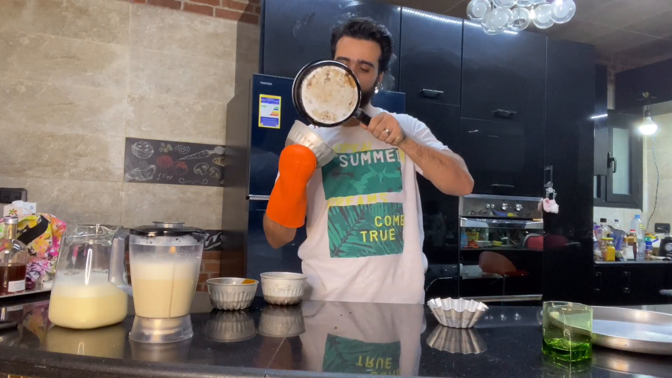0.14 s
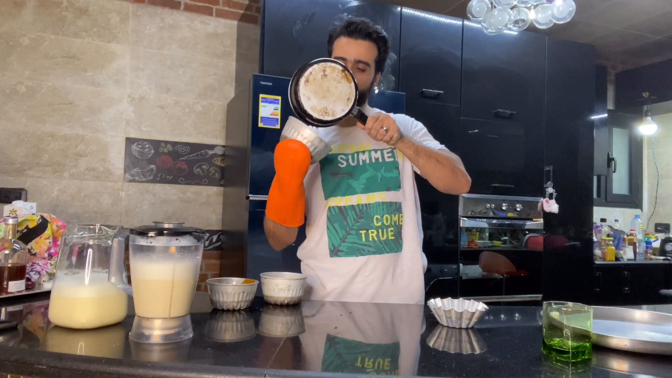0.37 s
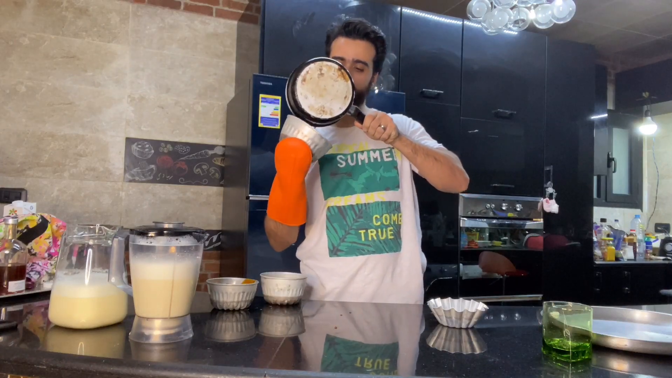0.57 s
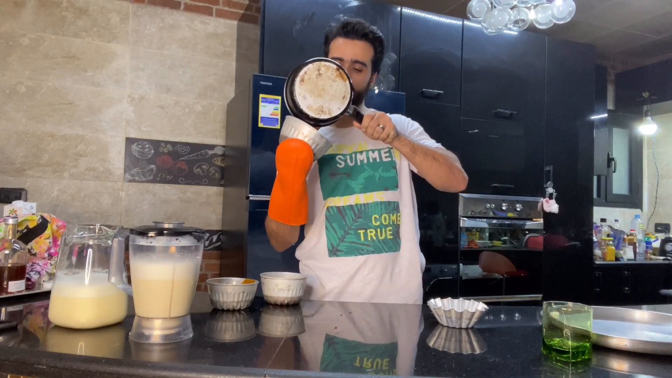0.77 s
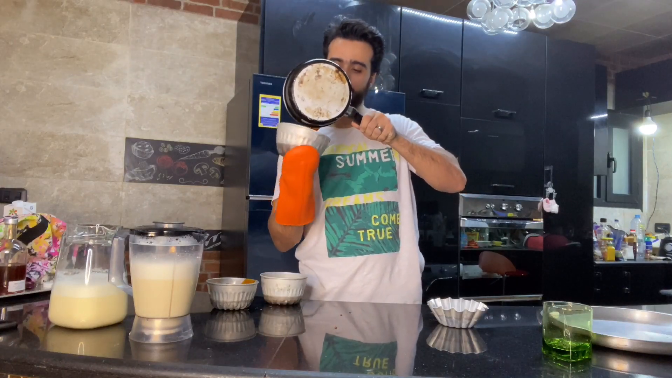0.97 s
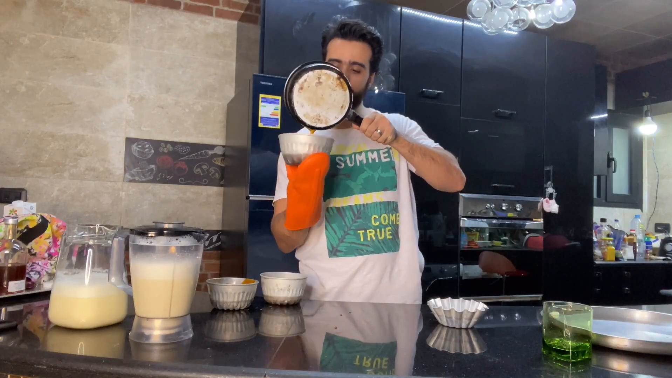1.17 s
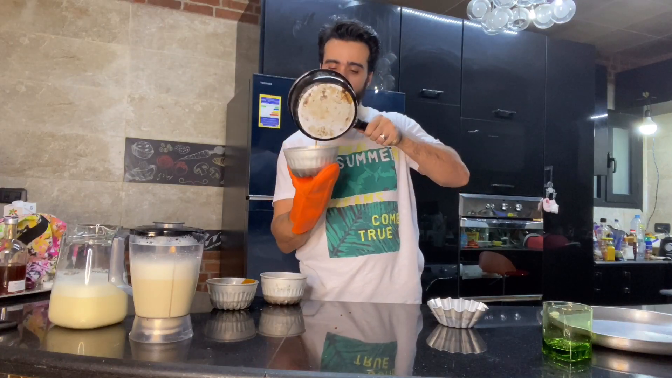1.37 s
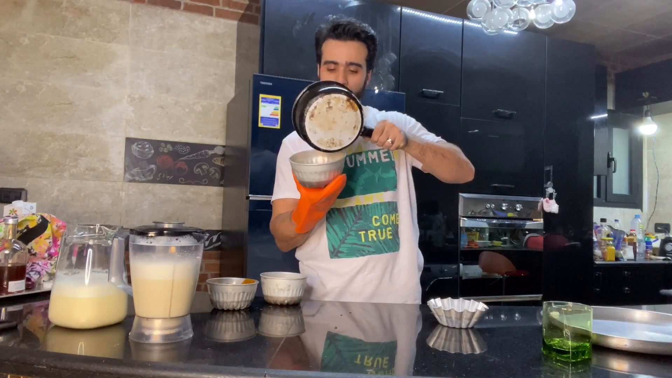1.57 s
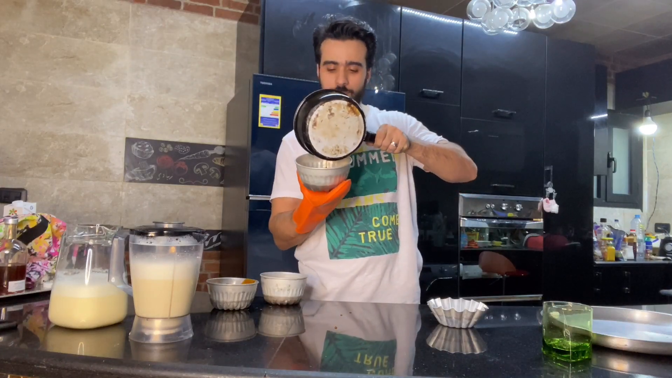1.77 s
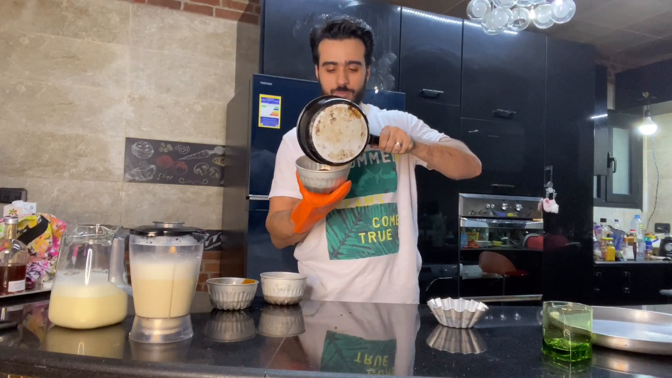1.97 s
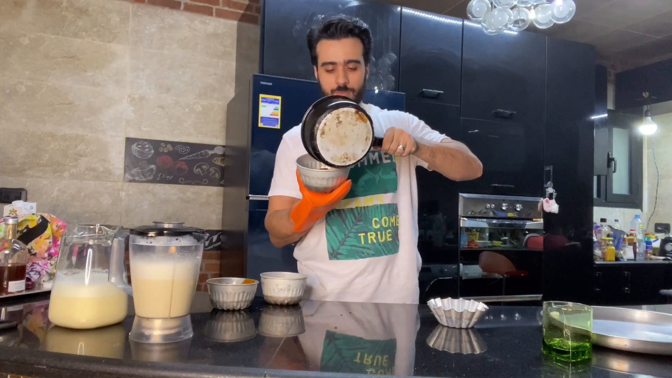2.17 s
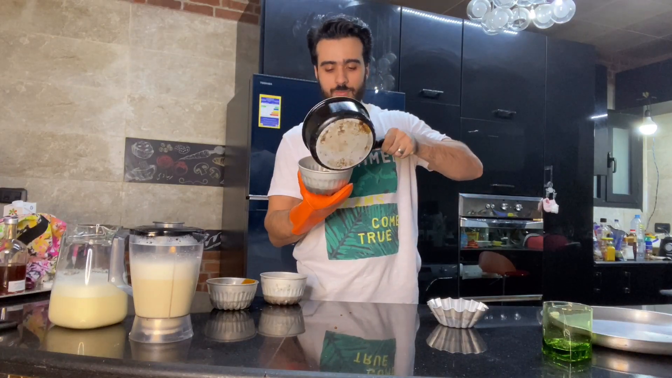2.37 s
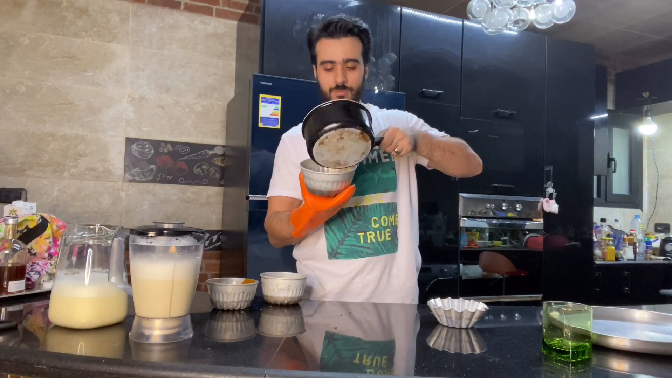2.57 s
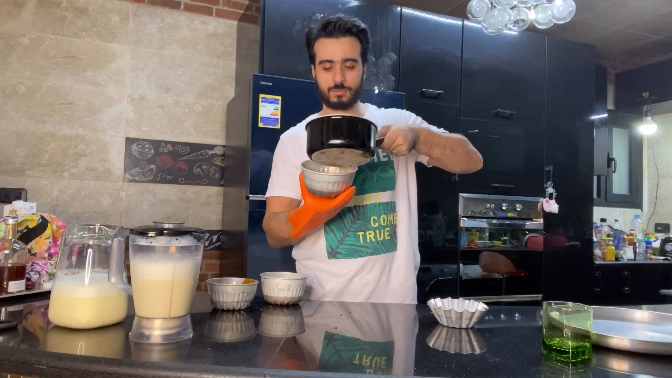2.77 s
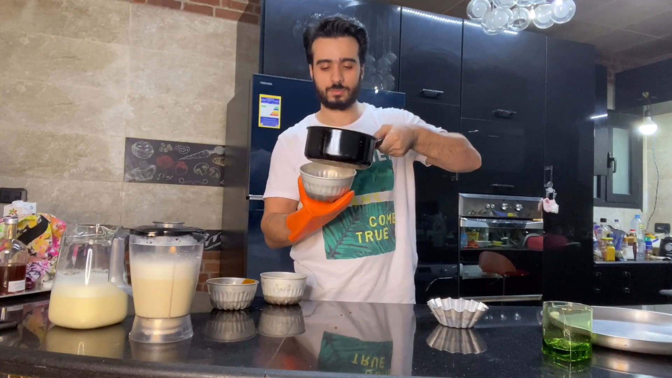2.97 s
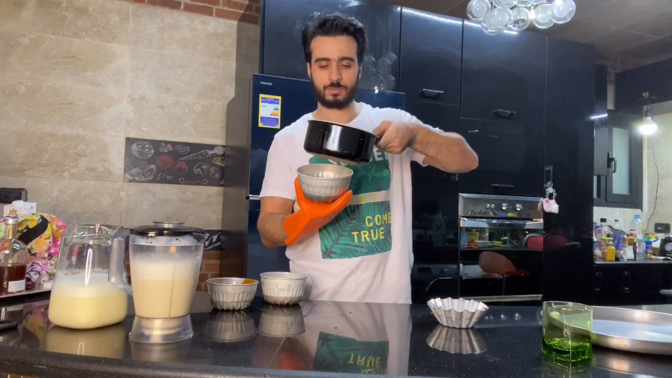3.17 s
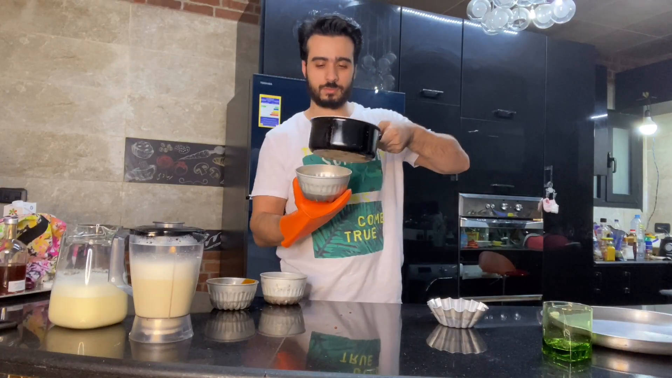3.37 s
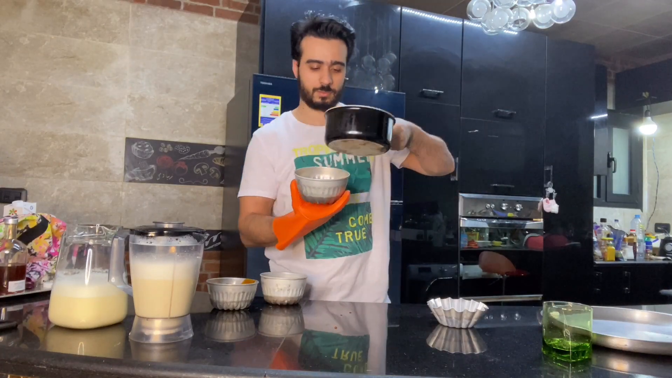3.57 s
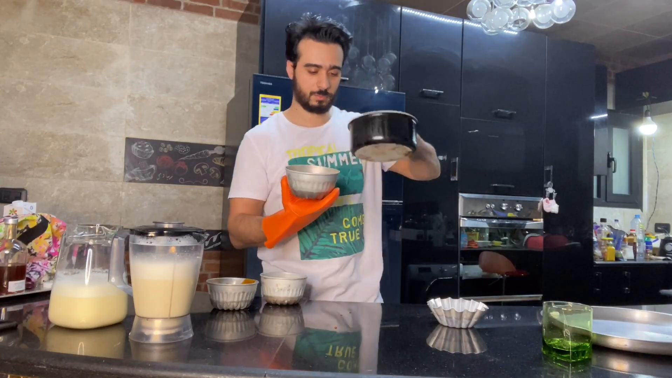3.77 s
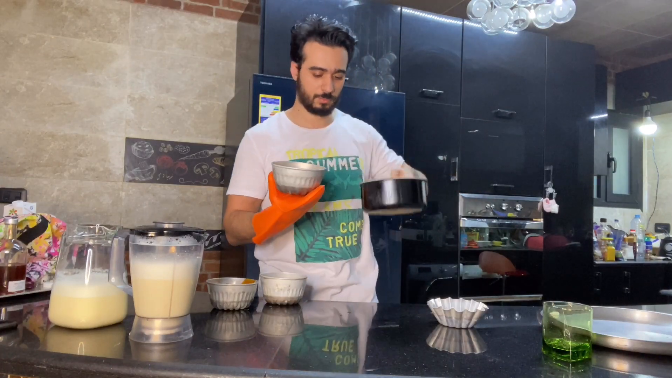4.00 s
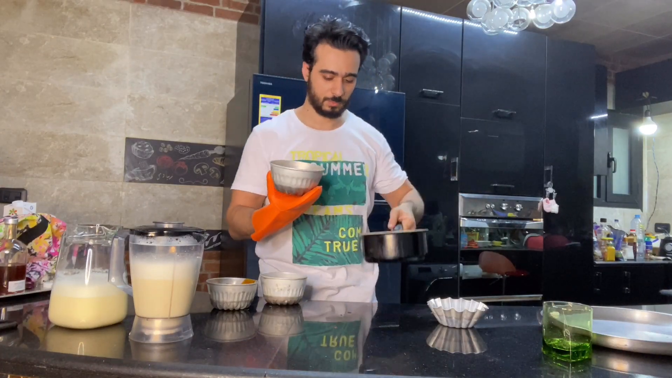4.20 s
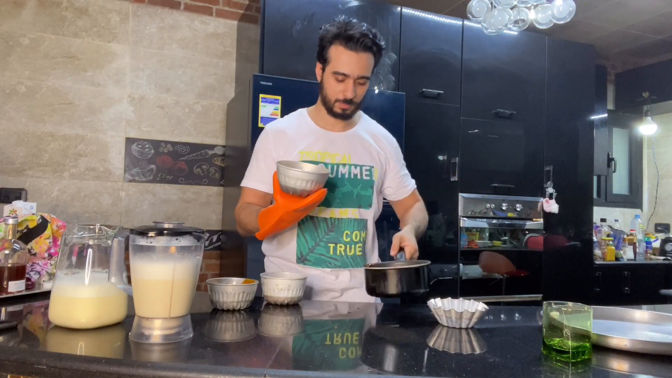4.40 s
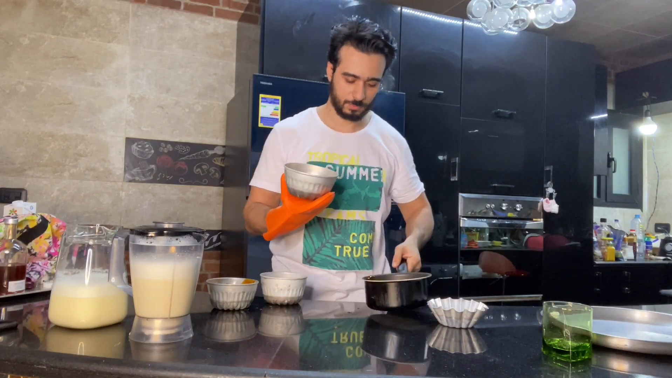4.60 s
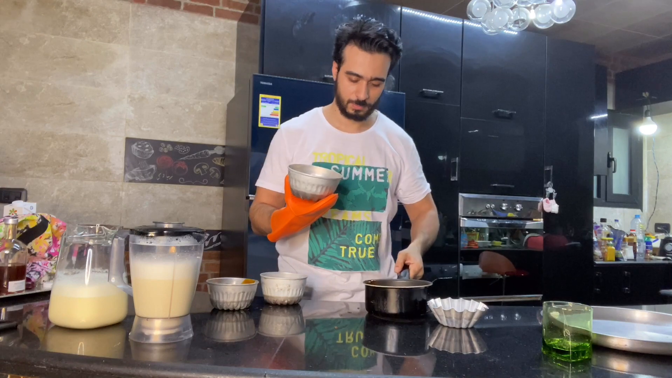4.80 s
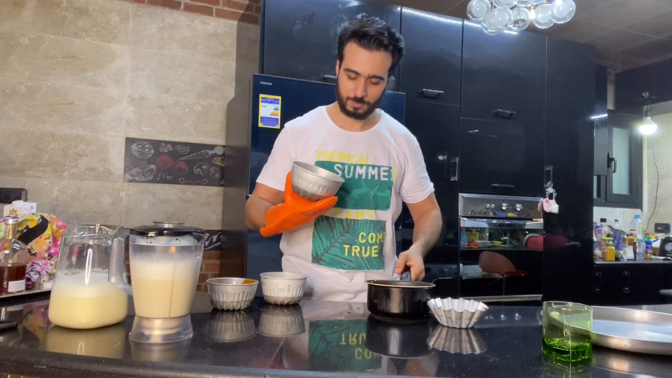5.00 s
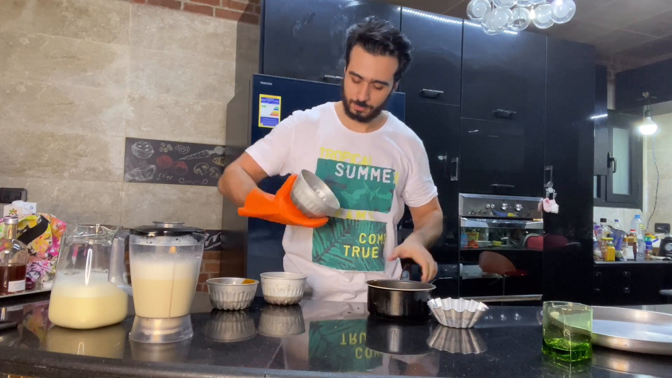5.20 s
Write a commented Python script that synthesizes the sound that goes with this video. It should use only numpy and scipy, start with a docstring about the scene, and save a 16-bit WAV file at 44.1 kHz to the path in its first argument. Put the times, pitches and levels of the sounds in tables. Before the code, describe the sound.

A kitchen with hard, reflective walls, heard in stereo from across the counter. Low rumble, faint hiss and a slightly drifting deep appliance hum run throughout. From 0 s hot caramel seethes softly as it runs from a saucepan, a low-mid fluttering murmur with fine fizz at the very start and a fainter surge around 1.5 s; after 1.6 s the stream thins and fades away. At 2.07 and 2.25 s the pan rim knocks the metal mould: two short bright clinks, the second duller, with a brief roomy reverberation. The hum's higher tone swells near 2.9, 3.3 and 4 s. Soles scuff lightly at 3.2, most clearly at 3.5, then faintly at 3.75 s. Rumble eases after 4.2 s. At 4.76 s the saucepan lands on stone with the loudest, solid knock, rocking in quick small taps until 4.9 s while its base rubs dully; a softer double tap and rub follow at 5.12 s.

```python
"""Hot caramel seethes softly from saucepan to metal mould in a kitchen: coloured noise, fluttering, thinning out.
An appliance hums (two drifting sines) over rumble and hiss (steady noise).
The pan's rim knocks the mould twice: noise bursts and decaying modes, answered by hard walls (noise echoes).
Soles shuffle on the floor: noise strokes. The pan lands, rocking, on a stone counter and its base rubs."""
import sys
import numpy as np
from scipy import signal
from scipy.fft import rfft, irfft, next_fast_len
from scipy.io import wavfile
from scipy.ndimage import uniform_filter1d, map_coordinates

SR = 44100
rng = np.random.default_rng(int(sys.argv[2]) if len(sys.argv) > 2 else 0)


def wav_record(signal):
    """Record a signal, one row per channel, as 16-bit PCM in the file named by sys.argv[1]."""
    frames = np.transpose(np.atleast_2d(signal))
    bounded = np.clip(frames, -1, 1)
    # unit amplitude maps onto the largest positive 16-bit level
    quanta = np.round(bounded * 32767).astype(np.int16)
    wavfile.write(sys.argv[1], SR, quanta)


N = 231436

# Spectra are relative: each sound is normalised, then set to its own level.
# seething syrup: freq_hz, density_db_per_hz
SEETHE_SPECTRUM = [(140, -16), (195, 12.5), (260, 1), (350, 5), (480, 4.5), (700, -1), (1100, -3),
                   (1450, -6), (1900, -6.5), (2300, -19.5), (2900, -31.5), (6000, -44)]
# finest bubbles: freq_hz, density_db_per_hz
FIZZ_SPECTRUM = [(1200, -32.5), (1700, -6), (2200, 1), (2450, -3.5), (2900, -25.5), (6000, -45.5)]
# surges of fine bubbling: full_s, hold_s, level_db
FIZZ_SURGES = [(0.026, 0.264, -73), (1.44, .2, -74.5)]
# room rumble: freq_hz, density_db_per_hz
RUMBLE_SPECTRUM = [(20, -20.5), (32, -15.5), (45, -5.5), (65, -8), (105, -6.5), (140, -12), (230, -17.5),
                   (430, -18.5), (700, -28.5), (1150, -31), (1500, -39.5), (2400, -41), (3200, -50),
                   (6000, -62.5)]
# faint hiss: freq_hz, density_db_per_hz
HISS_SPECTRUM = [(500, -34.5), (2500, 0), (4800, -1.5), (5200, 1.5), (5700, -3), (8500, -2), (12000, -6.5),
                 (13800, -14), (15000, -29.5)]
# swells of the motor hum's octave: full_s, hold_s, level_db
OCTAVE_SWELLS = [(2.865, 0.074, -53.5), (3.246, 0.3, -54), (3.923, 0.18, -53.5)]
# pan rim on mould: time_s, knock_db, contact_edge_hz, pan_db, clack_db, snap_db, thud_db, mould_db
CLINK_HITS = [(2.0689, -2, 2900, -13.5, -3, -28, -15.5, 3.5), (2.2536, -2, 2180, -1, -13, -26, -17, -2.5)]
# pan on counter: time_s, knock_db, contact_edge_hz, pan_db, clack_db, snap_db, thud_db
LANDING_HITS = [(4.7619, 4, 1740, -0.5, -13, -41, -12), (4.773, -16.5, 1010, -0.5, -16, -47, -12.5),
                (4.787, -2.5, 1310, -20, -20, -52, -19), (4.803, -2.5, 1180, -5, -20, -54, -16),
                (4.838, -9, 1610, -29, -37, -66, -25), (4.899, -18.5, 2120, -29, -19.5, -34.5, -31),
                (5.118, -17, 1670, -15, -23.5, -22, -16), (5.121, -9.5, 930, -10, -41, -43, -18)]
# saucepan modes: freq_hz, relative_energy_db, t60_s
PAN_MODES = [(286, -14, .12), (451, -3, .12), (655, -16, .08), (752, -14, .15), (786, -10, .18),
             (850, -11, .08), (913, -3, .18), (950, -6, .14), (1000, -8, .2), (1140, -7, .16),
             (1185, -10, .2), (1372, -7, .12), (1428, -7, .16), (1497, -3, .2), (1576, -6, .2),
             (1700, -6, .06), (1798, 3, .22), (2610, -12, .34)]
# mould modes: freq_hz, relative_energy_db, t60_s
MOULD_MODES = [(448, -8, .07), (525, -10, .08), (668, -1, .07), (1015, -8, .08), (1190, -8, .06),
               (1335, -11, .1), (1470, -11, .08), (1805, -1, .16), (1890, 0, .1), (2000, -1, .05),
               (2134, -3, .1), (2645, -6, .14), (2713, -6, .08), (2923, -10, .05), (3250, -15, .04),
               (3526, -13, .5), (4035, -13, .05), (5050, -16, .05), (5470, -16, .04), (5990, -22, .06)]
# edge on edge: freq_hz, response_db
CLACK_RESPONSE = [(400, -6.5), (1500, 5), (2900, 4.5), (3400, 6), (3900, 1.5), (4400, -2.5), (5400, -5),
                  (7500, -16.5), (11000, -26.5), (15000, -52)]
# hard point catching: freq_hz, response_db
SNAP_RESPONSE = [(2000, -7), (5000, -4), (7500, -1), (9500, -10.5), (11500, 4), (13000, -12), (16000, -18)]
# wall reverberation: freq_hz, t60_s
WALL_DECAY = [(100, 0.71), (400, 0.41), (1000, 0.47), (2800, 0.41), (7000, 0.29), (14000, 0.3)]
# wall colour: freq_hz, response_db
WALL_RESPONSE = [(100, -8), (400, 0.5), (1000, -0.5), (3000, -3.5), (7000, 2), (14000, -4)]
# diffuse sound at two spaced ports: freq_hz, left_right_likeness (limited to -1..1)
PORT_LIKENESS = [(60, .8), (130, 0.64), (290, 0.56), (640, 0.12), (1400, -0.33), (3100, 0.076), (7000, 0.2),
                 (9200, -1.23), (10800, 0.15), (15000, .3)]
# strokes of a sole: full_speed_s, hold_s, rise_db_per_s, fall_db_per_s, scuff_db, swish_db
SOLE_STROKES = [(3.221, 0.051, 160, 81, -64.5, -61), (3.524, 0.016, 260, 161, -52.5, -56.5),
                (3.747, 0.02, 105, 129.5, -66.5, -73.5), (3.863, 0.05, 65, 63, -90, -88),
                (4.223, 0.018, 448.5, 190, -69.5, -87)]
# grainy scuff: freq_hz, density_db_per_hz
SCUFF_SPECTRUM = [(600, -7), (1400, -2.5), (1900, 3), (2300, 2.5), (2800, 4.5), (4200, -1), (5500, -5),
                  (8000, -6.5), (11000, -34)]
# fine swish: freq_hz, density_db_per_hz
SWISH_SPECTRUM = [(3000, -5), (6000, 7), (9000, 9), (12000, 6.5), (14500, -1), (16000, -19)]
# base rubbing on the counter: freq_hz, density_db_per_hz
RUB_SPECTRUM = [(25, -10), (45, -0.5), (85, 6), (130, -10), (170, -1), (230, -15), (350, -1.5), (450, -4.5),
                (600, -16), (1500, -18.5), (2500, -28), (5200, -37), (7000, -43), (14000, -60.5)]
# rubs after a landing: full_s
RUB_TIMES = [4.785, 5.125]

POUR_START_DB, COOLING_DB_PER_S = -55.5, 0.25  # the running syrup slowly calms
THINNING_START_S, THINNING_DB_PER_S = 1.6, 10  # then the stream thins out
SURGE_SLOPE_DB_PER_S = 33  # rise and fall
OCTAVE_RISE_DB_PER_S, OCTAVE_FALL_DB_PER_S = 171.5, 105
RUMBLE_DB, LULL_START_S, LULL_FADE_S, LULL_CHANGE_DB = -53.5, 4.2, 0.22, -4
RUB_DB, RUB_HOLD_S, RUB_RISE_DB_PER_S, RUB_FALL_DB_PER_S = -46, 0.19, 1500, 28
BAND_LIMIT_HZ = 15800


def amp(db):
    """Decibels to gain."""
    return 10 ** (np.asarray(db) / 20)


def unit(x):
    """Scale to rms 1."""
    return x / np.sqrt(np.mean(x ** 2) + 1e-20)


def unit_energy(x):
    """Scale each channel to energy 1."""
    return x / np.sqrt(np.sum(x ** 2, axis=-1, keepdims=True) + 1e-20)


def along(points, hz):
    """Interpolate (freq_hz, value) points on a log-frequency axis."""
    freq_hz, value = np.transpose(points)
    return np.interp(np.log(hz + 1), np.log(freq_hz + 1), value)


def wobble(knots_per_s):
    """Smooth random curve through normal random knots."""
    knots = rng.standard_normal(int(N * knots_per_s / SR) + 4)
    return map_coordinates(knots, [np.arange(N) * knots_per_s / SR])


def swell(full_s, hold_s, rise_db_per_s, fall_db_per_s):
    """Gain that rises to 1 at full_s, holds, and falls away."""
    t = np.arange(N) / SR - full_s
    rise_db = -abs(rise_db_per_s) * np.maximum(-t, 0)
    fall_db = -abs(fall_db_per_s) * np.maximum(t - hold_s, 0)
    return amp(rise_db + fall_db)


def filtered(x, response):
    """Apply a frequency response to x."""
    size = x.shape[-1]
    padded = next_fast_len(size + SR // 4)
    hz = np.fft.rfftfreq(padded, 1 / SR)
    return irfft(rfft(x, padded) * response(hz), padded)[..., :size]


def coloured(x, spectrum):
    """Causal minimum-phase colouring: an attack stays sharp."""
    size = len(x)
    gain = amp(along(spectrum, np.fft.rfftfreq(size, 1 / SR)))
    cepstrum = irfft(np.log(gain), size)
    # fold the cepstrum onto positive time
    cepstrum[1:size // 2] *= 2
    cepstrum[size // 2 + 1:] = 0
    return irfft(rfft(x) * np.exp(rfft(cepstrum)), size)


def edge(x, hz, kind, order):
    """Causal Butterworth low-pass or high-pass."""
    sos = signal.butter(order, min(hz, SR / 2 - 1), kind, fs=SR, output="sos")
    return signal.sosfilt(sos, x)


def diffuse(spectrum, size):
    """Coloured stereo noise of rms 1, as if from all sides: mid/side balance sets channel likeness."""
    def mid_side_response(hz):
        angle = np.arccos(np.clip(along(PORT_LIKENESS, hz), -1, 1)) / 2
        return amp(along(spectrum, hz)) * [np.cos(angle), np.sin(angle)]

    mid, side = filtered(rng.standard_normal((2, size)), mid_side_response)
    return unit(np.array([mid + side, mid - side]))


def caramel(flutter_db=1.53):
    """Hot syrup seethes while it runs, fizzes up in surges and dies away as the stream thins."""
    t = np.arange(N) / SR
    thinning_db = THINNING_DB_PER_S * np.maximum(t - THINNING_START_S, 0)
    seethe_db = POUR_START_DB - COOLING_DB_PER_S * t - thinning_db
    surge = sum(amp(level_db) * swell(full_s, hold_s, SURGE_SLOPE_DB_PER_S, SURGE_SLOPE_DB_PER_S)
                for full_s, hold_s, level_db in FIZZ_SURGES)
    seethe = amp(seethe_db) * diffuse(SEETHE_SPECTRUM, size=N)
    fizz = surge * diffuse(FIZZ_SPECTRUM, size=N)
    return amp(flutter_db * wobble(42)) * (seethe + fizz)


def background(hum_hz=86, hum_db=-62, octave_db=-64, hiss_db=-80.5):
    """Rumble that drops late on, faint hiss, and a drifting motor hum whose octave swells and fades."""
    lull = np.clip((np.arange(N) / SR - LULL_START_S) / LULL_FADE_S, 0, 1)
    rumble = amp(RUMBLE_DB + LULL_CHANGE_DB * lull) * diffuse(RUMBLE_SPECTRUM, size=N)
    hiss = amp(hiss_db) * diffuse(HISS_SPECTRUM, size=N)

    swells = sum(amp(level_db) * swell(full_s, hold_s, OCTAVE_RISE_DB_PER_S, OCTAVE_FALL_DB_PER_S)
                 for full_s, hold_s, level_db in OCTAVE_SWELLS)
    phase = 2 * np.pi * np.cumsum(hum_hz + 0.79 * wobble(2.8)) / SR
    fundamental = amp(hum_db + 2.8 * wobble(6)) * np.sin(phase)
    octave = np.hypot(amp(octave_db), swells) * np.sin(2 * phase)
    return np.sqrt(2) * (fundamental + octave) + rumble + hiss  # sqrt(2): sine levels are rms


def contact(t, chatter, t60_s):
    """A sharp push with a brief chatter of dense, fast-dying vibration."""
    vibration = rng.standard_normal(len(t)) * amp(-60 * t / t60_s)
    return (t == 0) + chatter * unit_energy(vibration)


def ring(modes, t, scatter_db):
    """Decaying sine modes, with new random strengths and signs for each impact."""
    hz, energy_db, t60_s = np.transpose(modes)[:, :, None]
    scattered_db = energy_db + scatter_db * rng.standard_normal(hz.shape)
    strength = amp(scattered_db) * rng.choice([-1, 1], hz.shape)
    partials = unit_energy(amp(-60 * t / t60_s) * np.sin(2 * np.pi * hz * t))
    return unit_energy(np.sum(strength * partials, axis=0))


def blow(t, knock_db, contact_edge_hz, pan_db, clack_db, snap_db, thud_db):
    """One contact knocks and rings the pan; its upper edge limits the knock and the ring."""
    def soften(x):
        """Cut above the contact's upper edge."""
        return unit_energy(edge(x, contact_edge_hz, "low", order=8))

    knock_push = contact(t, chatter=0.19, t60_s=0.051)
    knock = soften(edge(knock_push, 0.62 * contact_edge_hz, "high", order=2))
    clack = unit_energy(coloured(contact(t, chatter=1.1, t60_s=0.044), CLACK_RESPONSE))
    snap = unit_energy(coloured(contact(t, chatter=9, t60_s=0.02), SNAP_RESPONSE))
    low_push = edge(contact(t, chatter=0.35, t60_s=0.025), 440, "low", order=3)
    thud = unit_energy(edge(low_push, 130, "high", order=2))
    pan = soften(ring(PAN_MODES, t, scatter_db=3.0))
    impact = amp(knock_db) * knock + amp(clack_db) * clack + amp(snap_db) * snap + amp(thud_db) * thud
    return impact + amp(pan_db) * pan


def evened(x, width_hz):
    """Many paths together favour no pitch: level out the broad humps of a random echo pattern."""
    padded = next_fast_len(2 * x.shape[-1])
    z = rfft(x, padded)

    def smooth_power(hz):
        bins = max(int(hz * padded / SR), 1)
        return np.abs(uniform_filter1d(np.abs(z) ** 2, bins, axis=-1)) + 1e-12

    levelling = np.sqrt(smooth_power(20 * width_hz) / smooth_power(width_hz))
    return irfft(z * levelling, padded)[..., :x.shape[-1]]


def kitchen(x, wet_db, early_db, early_t60_s, lag_s):
    """Direct sound reaches the right port first; the counter and then the walls answer as noise echoes."""
    t = np.arange(len(x)) / SR
    hz, frame_s, z = signal.stft(diffuse(WALL_RESPONSE, size=len(x)), SR, nperseg=256)
    decay = amp(-60 * frame_s / along(WALL_DECAY, hz)[:, None])
    tail = signal.istft(z * decay, SR, nperseg=256)[1][:, :len(x)]
    tail = unit_energy(tail * (1 - np.exp(-t / 0.0066)))

    early = diffuse(WALL_RESPONSE, size=len(x)) * amp(-60 * t / early_t60_s)
    early = unit_energy(early * (1 - np.exp(-t / 0.0011)))
    echoes = evened(amp(wet_db) * tail + amp(early_db) * early, width_hz=35)
    answer = signal.fftconvolve(x[None], echoes, axes=1)[:, :len(x)]

    # half the lag on each side: left late, right early
    sides = np.array([[1], [-1]])
    direct = filtered(x, lambda f: np.exp(-1j * np.pi * f * lag_s * sides))
    return answer + direct


def metal():
    """The pan strikes the mould, which rings with it, and then the counter; the kitchen answers each blow."""
    out = np.zeros((2, N + 2 * SR))
    t = np.arange(SR) / SR
    hits = []
    for time_s, *settings, mould_db in CLINK_HITS:
        mould = amp(mould_db) * ring(MOULD_MODES, t, scatter_db=3.0)
        hits.append((time_s, blow(t, *settings) + mould))
    for time_s, *settings in LANDING_HITS:
        hits.append((time_s, blow(t, *settings)))
    for time_s, sound in hits:
        start = round(time_s * SR)
        out[:, start:start + SR] += kitchen(sound, wet_db=0.78, early_db=-1.0, early_t60_s=0.14, lag_s=.00008)
    return out[:, :N]


def shuffle(grain_db=0.5, swish_power=1.36):
    """Soles slide over the floor: a grainy scuff, and a finer swish that grows faster with speed."""
    scuff_gain, swish_gain = np.zeros((2, N))
    for full_speed_s, hold_s, rise_db_per_s, fall_db_per_s, scuff_db, swish_db in SOLE_STROKES:
        speed = swell(full_speed_s, hold_s, rise_db_per_s, fall_db_per_s)
        scuff_gain += amp(scuff_db) * speed
        swish_gain += amp(swish_db) * speed ** swish_power
    scuff = scuff_gain * diffuse(SCUFF_SPECTRUM, size=N)
    swish = swish_gain * diffuse(SWISH_SPECTRUM, size=N)
    return amp(grain_db * wobble(320)) * (scuff + swish)


def slide(grip_db=1.5):
    """The pan's base rubs unevenly over the counter while it settles."""
    rubs = [swell(full_s, RUB_HOLD_S, RUB_RISE_DB_PER_S, RUB_FALL_DB_PER_S) for full_s in RUB_TIMES]
    rubbing = np.max(rubs, axis=0)
    return amp(RUB_DB + grip_db * wobble(70)) * rubbing * diffuse(RUB_SPECTRUM, size=N)


def scene():
    """Everything that sounds in the kitchen."""
    return caramel() + background() + metal() + shuffle() + slide()


def record(dry):
    """Nothing is kept above the band limit."""
    return filtered(dry, lambda hz: hz < BAND_LIMIT_HZ)


dry = scene()
out = record(dry)
wav_record(out)
```